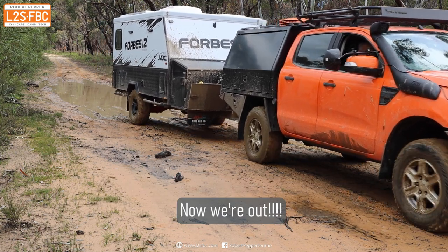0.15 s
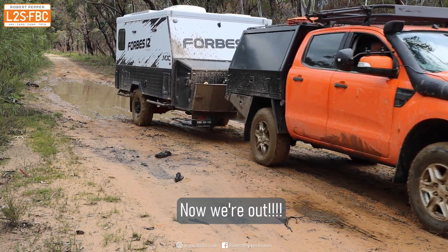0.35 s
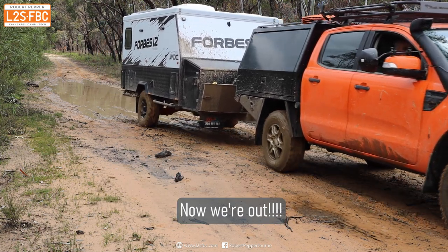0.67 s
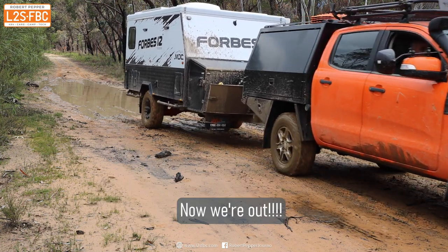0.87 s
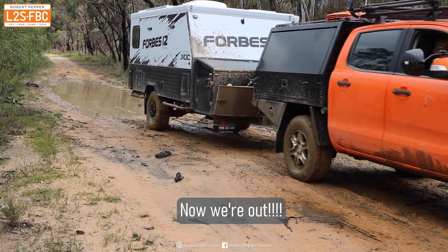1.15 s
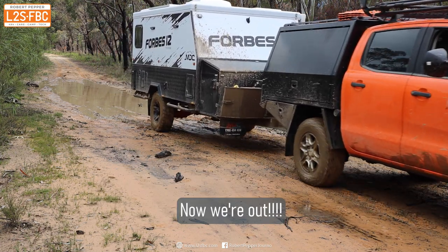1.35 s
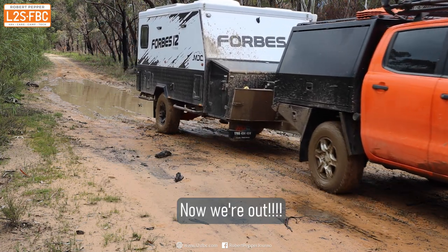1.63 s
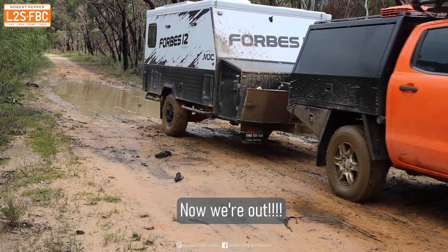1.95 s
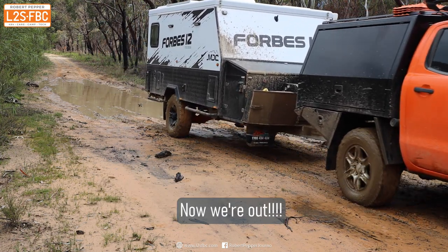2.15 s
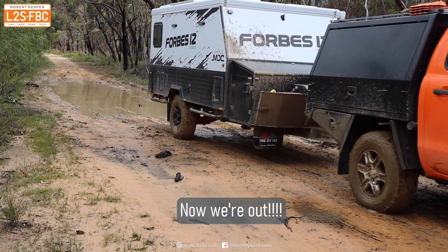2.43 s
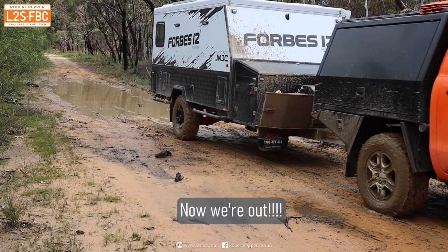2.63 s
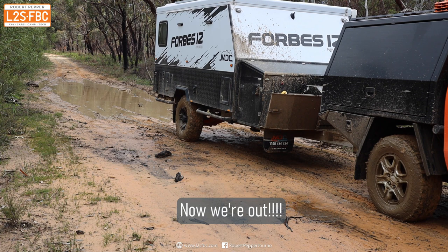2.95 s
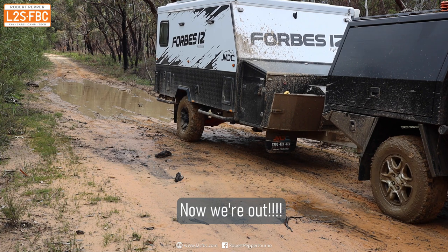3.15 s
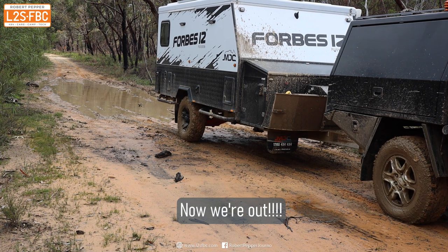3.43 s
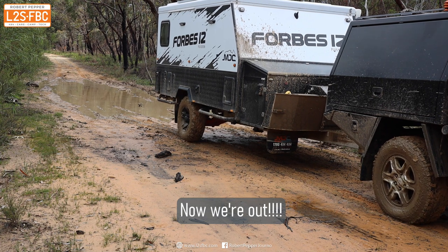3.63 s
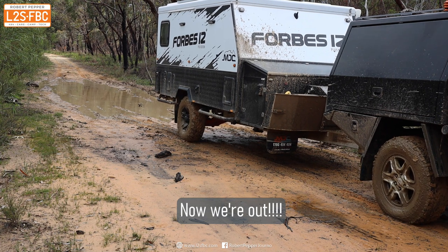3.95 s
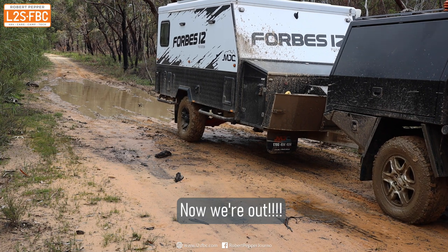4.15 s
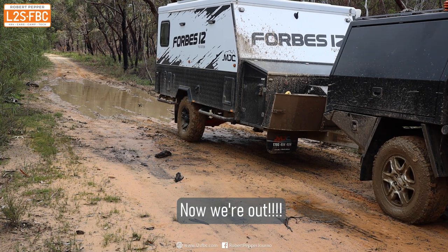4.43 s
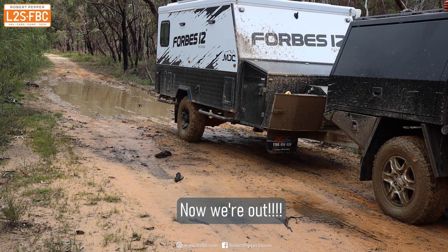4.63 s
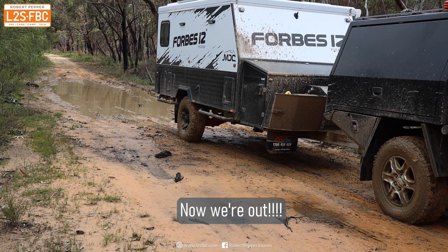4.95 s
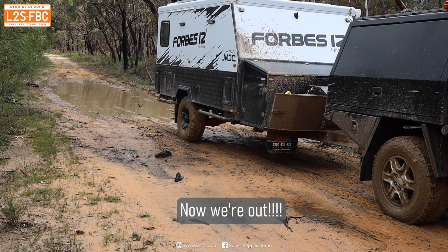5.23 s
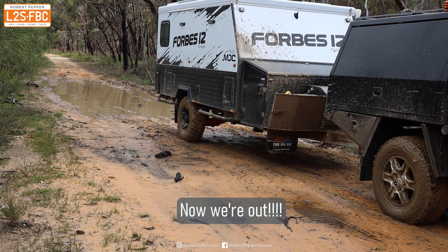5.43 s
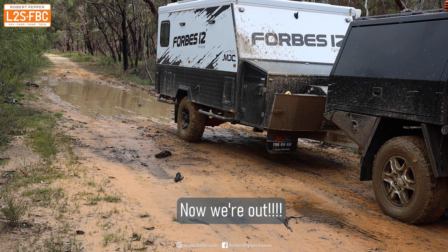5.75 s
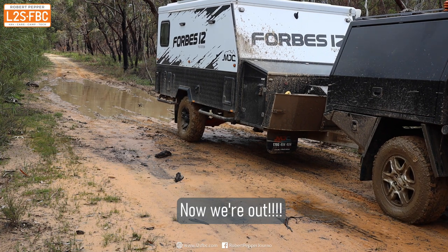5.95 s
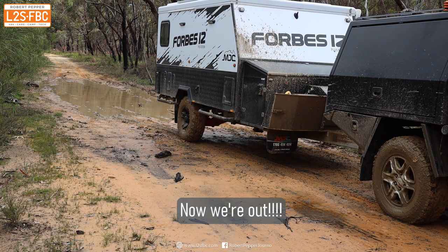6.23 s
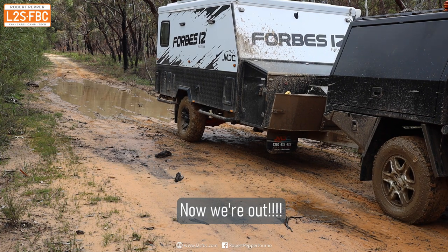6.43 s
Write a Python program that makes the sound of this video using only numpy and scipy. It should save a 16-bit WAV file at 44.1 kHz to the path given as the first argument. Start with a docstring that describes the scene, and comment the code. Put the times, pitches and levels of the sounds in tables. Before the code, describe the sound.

A diesel pickup growls under load pulling a trailer through mud, drops to a low throbbing idle, then creeps on with clattering knock and airy roar.

```python
"""A five-cylinder diesel pickup drags a trailer out of mud, drops to idle and creeps on, close by on the right.
The tailpipe throbs once per firing: six sine waves in step with the engine, coloured by the pipe.
Each cylinder strikes the ringing silencer and engine block with its own strength.
The hitch cracks, faint treble bursts flick past, and filtered noise makes the roar of fan and intake.
A small two-port stereo microphone hears it: bass in the middle, treble right and out of phase."""
import sys
import numpy as np
from scipy import signal
from scipy.fft import rfft, irfft, next_fast_len
from scipy.io import wavfile

SR = 44100
rng = np.random.default_rng(int(sys.argv[2]) if len(sys.argv) > 2 else 0)


def output_pcm(signal):
    """Save a mono or channel-first signal as 16-bit PCM at the path in sys.argv[1].

    Samples are clipped to [-1, 1] before scaling.
    """
    pcm = np.clip(np.atleast_2d(signal).T, -1, 1) * 32767
    wavfile.write(sys.argv[1], SR, np.round(pcm).astype(np.int16))


def gain_from_db(level_db):
    """Convert decibel levels to linear amplitude factors (20 dB per decade)."""
    decades = np.asarray(level_db, float) / 20
    return 10 ** decades


N = 290609   # length in samples

# engine speed: t/s, firing rate/Hz
FIRING_RATE = [(0.0, 48.664), (0.299, 47.557), (0.598, 48.269), (0.875, 45.852), (1.165, 44.738),
               (1.518, 34.336), (1.642, 36.132), (2.046, 35.892), (2.2, 34.474), (2.403, 35.479),
               (2.58, 33.83), (3.034, 34.269), (4.396, 34.126), (4.717, 38.403), (4.823, 36.946),
               (5.219, 35.16), (5.994, 34.262), (6.59, 34.219)]
# when one stage hands over to the next: from, to, from, to ... t/s
# the five stages are pulling, easing off, rolling, creeping, standing
HAND_OVERS = [.6, .85, 1.3, 1.6, 2.3, 2.8, 4.5, 4.8]
# strength of the exhaust pulse: t/s, rms level of its first order before the pipe/dB
EXHAUST = [(0, -4), (1.2, -6), (1.7, -5), (2.4, -3), (2.6, -5.5), (4.4, -3.5), (4.85, -9), (6.59, -9.5)]
# what exhaust pipe and ground pass on: f/Hz, level/dB
PIPE = [(34, -30), (38, -25.5), (48, -13), (67, -9.5), (75, -15), (88, -14), (98, -4.5), (110, 2), (134, 3),
        (146, -2.5), (158, -8), (170, -2.2), (188, 8.5), (222, -15), (240, 2.5), (265, -28), (290, 2.5)]
# ringing tones of the silencer: f/Hz, t60/s, moment of the strike/firing intervals,
# ring level at each stage/dB, extra level of each cylinder/dB
SILENCER = [(141, 0.085, 0.318, [-30.5, -30.5, -22, -25, -22], [7.5, 5, -12, -9.5, -30]),
            (165.3, 0.14, 0.43, [-31, -31, -27, -21.5, -30.5], [0, 9, -25.5, -0.5, -11.5]),
            (191, 0.4, 0.46, [-52, -26.5, -22, -21.5, -26.5], [3, -9, -24, 1.5, -28]),
            (209.2, .12, 0.446, [-54, -33, -36, -24, -38], [-2.5, 5, -22.5, -10.5, 2]),
            (239, 0.13, 0.506, [-31, -39, -8, -26, -29], [-5, -11, -8, -11.5, -9]),
            (278, 0.018, 0.528, [-10, -32, -19, -33, -54], [3, -20.5, 3.5, -26.5, 5.5])]
# ringing tones of block, covers and panels: same columns
BLOCK = [(371.9, 0.077, .7, [-23.5, -18.5, -26.5, -20, -23.5], [-2, -3.5, -8, -12, -2.5]),
         (558.8, 0.23, .65, [-37, -40.5, -31.5, -34.5, -36.5], [7, 3.5, 0, -5.5, -11]),
         (607.7, 0.062, .55, [-23, -29, -42, -24.5, -29.5], [2, -1.5, -10, -3, 2.5]),
         (1042, .11, .72, [-36, -42, -30, -22.5, -33], [-12, -13, -16, 0, -6]),
         (1164, 0.05, 0.45, [-33, -45, -30, -24, -38], [0, -2, -2, -13, -8]),
         (1400, 0.022, .7, [-23, -22, -22.5, -52, -45], [-3.5, 2.5, -0.5, -4, 2]),
         (1293, .11, .75, [-36, -36, -26, -36, -25], [0, -6, -4, -4, -7]),
         (1497, .1, .7, [-34, -24, -31, -25, -34], [-9, -5, -9, 0, -2]),
         (1629, 0.068, .7, [-36.5, -30, -30, -25, -38], [-8, 3.5, -1, -16, -15.5]),
         (1850, 0.06, 0.55, [-29, -40, -23, -50, -36], [0, -4, -1, -10, -12]),
         (1935, .04, .8, [-33, -37, -34, -33, -26], [0, -3, -4, -2, -7]),
         (2140, .017, .6, [-28, -23, -26, -17.5, -19], [-1, -9, 0, -1, -9]),
         (2520, 0.067, 0.76, [-36, -31, -52, -47, -39.5], [0, -20, -13, -1, -4]),
         (3120, .014, .7, [-32, -30, -32, -27, -28], [0, -5, -1, -3, -4]),
         (3800, 0.019, 1, [-44, -42, -44, -43, -57], [0, -22.5, -4, -1, 8.5])]
# tow hitch and chains take up slack: t/s, level of the main ring/dB, f/Hz, t60/s
HITCH = [(0.429, -21.5, 2000, 0.041), (2.088, -16.5, 278, 0.19), (4.296, -23.5, 2800, 0.029)]
# faint short bursts of bright noise: t/s, starting level/dB
TREBLE_BURSTS = [(1.409, -47), (2.068, -49.5), (2.549, -48.5), (2.859, -49), (3.101, -50), (3.244, -47.5),
                 (4.228, -45.5), (4.293, -50)]
# air noise of fan, intake and tyres, before any echo: t/s, roar level/dB, hiss level/dB
AIR = [(0.0, -22, -40.5), (1.0, -22.5, -41.5), (1.38, -25, -40.5), (2.0, -23.5, -40.5), (2.4, -24, -44.5),
       (3.4, -27.5, -51), (4.5, -27.5, -49.5), (6.59, -28.5, -46)]
# colour of the roar, only the shape counts: f/Hz, level per Hz/dB
ROAR = [(30, -32), (45, -28.5), (110, -8), (190, -7.5), (290, -9), (400, -11.5), (570, -15), (900, -16.5),
        (1150, -20), (1370, -15), (1560, -16.5), (1780, -21.5), (2200, -19), (3200, -29.5), (3600, -14.5),
        (4500, -56), (7000, -73), (9000, -88)]
# colour of the hiss, only the shape counts: f/Hz, level per Hz/dB
HISS = [(2000, -10), (3000, 14), (3500, -3.5), (4200, -11.5), (5000, -1), (6000, -34), (7000, -28),
        (8500, -11.5), (10500, -44.5), (13000, -58), (15500, -62)]
# echo of the engine bay off ground and bodywork: delay at each stage, t/s
ECHO_DELAY = [.00127, .00134, .00162, .00185, .00147]
# strength of that echo at each stage: level/dB
ECHO_LEVEL = [-18, -9, -13, -9, -16]
# the range the echo keeps: lower f/Hz, upper f/Hz
ECHO_BAND = [390, 2500]
# microphone: f/Hz, side over mid level before the trim/dB, side phase/rad,
# share of the side's power that comes straight from the truck
PORTS = [(60, -41, 2.4, .4), (170, -26, 2.4, 0.72), (350, -19.5, 2.8, .75), (700, -10.5, 2.7, 0.97),
         (1400, -2.5, 3.45, 0.97), (2800, 2, 3.92, 0.94), (5400, 5.5, 3.9, 0.85), (7200, 11, 3.5, 0.5),
         (12000, 7.5, 4, 0.56)]
# the engine bay swings further to the right: t/s, trim of the side level/dB
SIDE_TRIM = [(0, -3.5), (1.5, -1.5), (3, 1), (6.59, 1.7)]


def tailpipe(per_s, turns):
    """Exhaust pulses: a lopsided wave built from six multiples (orders) of the firing rate."""
    pulse_turn = 0.38        # place of the pulse within a firing interval
    fall_db = 12             # per octave of order: the pulse is a blunt one
    skew_rad = 2.05          # lag common to all orders: sets how lopsided the pulse is
    cancel_hz, damping, width = 89.5, 0.055, 0.53   # where two paths through the silencer cancel
    angle = 2 * np.pi * (turns - pulse_turn)
    pulse_db, = in_time(EXHAUST)
    out = 0
    for order in range(1, 7):
        hz = order * per_s
        # each order slides through the pipe's colour as the speed changes
        level_db = pulse_db - fall_db * np.log2(order) + at_hz(PIPE, hz)
        flicker_db = 0.12 * drift(6.8)
        x = hz / cancel_hz
        # orders below the cancelling pitch lag, those above it lead
        lead = np.angle((1 - x * x + 1j * x * damping) / (1 - x * x + 1j * x * width))
        wave = np.sin(order * angle + lead - skew_rad)
        out = out - np.sqrt(2) * gain_from_db(level_db + flicker_db) * wave
    return out


def silencer(turns):
    """The differences between the cylinders set the silencer ringing."""
    return struck(turns, SILENCER, scatter_db=0.4, scatter_s=0.00028, uneven_only=0.87, rattle_db=-np.inf)


def block_knock(turns):
    """Combustion knock strikes block, covers and panels, and loose parts rattle along."""
    return struck(turns, BLOCK, scatter_db=1.1, scatter_s=.0002, uneven_only=0, rattle_db=-39)


def struck(turns, modes, scatter_db, scatter_s, uneven_only, rattle_db):
    """Every firing strikes every ringing tone, with its cylinder's strength and a little chance."""
    soft_onset = .15   # a body takes about this share of its ring time to get going
    t = np.arange(N) / SR
    firing = np.arange(int(turns[-1]) + 1)
    out = np.zeros(N)
    for hz, t60, turn, stage_db, cylinder_db in modes:
        chance = rng.standard_normal((len(firing), 2))
        s = np.interp(firing + turn, turns, t) + scatter_s * chance[:, 0]
        strength = gain_from_db(cylinder_db)
        # the part shared by all cylinders is already in the tailpipe's orders
        strength = strength - uneven_only * strength.mean()
        blow_level = gain_from_db(by_stage(s, stage_db) + scatter_db * chance[:, 1])
        blows = strength[firing % 5] * blow_level
        at = np.clip(s * SR, 0, N - 1).astype(int)
        shaking = gain_from_db(by_stage(t, stage_db) + rattle_db)   # loose parts keep the tone alive
        drive = np.bincount(at, blows, N) + shaking * rng.standard_normal(N)
        # taking away a faster-dying ring softens the onset
        out += 1.06 * (ring(drive, hz, t60) - ring(drive, hz, soft_onset * t60))
    return out


def hitch():
    """Slack taken up: each click rings one main tone and two weaker, higher ones."""
    out = np.zeros(N)
    for s, level_db, hz, t60 in HITCH:
        click = np.zeros(N)
        click[round(s * SR)] = gain_from_db(level_db)
        out += ring(click, hz, t60)
        out += 0.23 * ring(click, 1.8 * hz, 0.31 * t60)
        out += 0.24 * ring(click, 1.7 * hz, t60)
    return out


def treble_bursts():
    """Each burst is a short stretch of bright noise that starts at once and dies away."""
    t60 = 0.083   # s
    t = np.arange(N) / SR
    bursts = np.zeros(N)
    for s, level_db in TREBLE_BURSTS:
        bursts += (t >= s) * gain_from_db(level_db - 60 * np.maximum(t - s, 0) / t60)
    bright = signal.butter(2, [3500, 7500], "band", fs=SR, output="sos")
    noise = signal.sosfilt(bright, rng.standard_normal(N))
    return bursts * amp_rms(noise)


def air_noise(turns):
    """Rushing air: the roar of fan and intake with the hiss above it."""
    roar_db, hiss_db = in_time(AIR)
    roar = gain_from_db(roar_db) * air(ROAR, turns, patchy_db=1.0, puff_db=1.5, puff_turn=0.83)
    hiss = gain_from_db(hiss_db) * air(HISS, turns, patchy_db=.9, puff_db=1.5, puff_turn=.8)
    return roar + hiss


def air(spectrum, turns, patchy_db, puff_db, puff_turn):
    """Third-octave noise bands flicker and swell with each firing, most in the treble; rms 1."""
    edges = 35 * 2 ** np.arange(0, 8.8, 1 / 3)   # Hz
    white = rng.standard_normal((2, N))
    together = drift(24)   # flicker shared by all bands
    puff = np.cos(2 * np.pi * (turns - puff_turn))
    out = 0
    for k, (low, high) in enumerate(zip(edges, edges[1:])):
        hz = np.sqrt(low * high)
        level_db = at_hz(spectrum, hz)
        if level_db > -75:   # leave out bands too faint to matter
            band_filter = signal.butter(2, [low, high], "band", fs=SR, output="sos")
            band = signal.sosfilt(band_filter, white[k % 2])   # neighbours use separate noise
            swell_db = puff_db * puff * hz / (hz + 700)
            flicker_db = patchy_db * (0.6 * together + drift(16))
            out = out + band * gain_from_db(level_db + swell_db + flicker_db)
    return amp_rms(out)


def with_echo(x):
    """A late copy, thin in bass and treble, combs the sound; its delay glides from stage to stage."""
    t = np.arange(N) / SR
    thin = signal.sosfilt(signal.butter(1, ECHO_BAND, "band", fs=SR, output="sos"), x)
    late = np.interp(t - by_stage(t, ECHO_DELAY), t, thin)
    return x + gain_from_db(by_stage(t, ECHO_LEVEL)) * late


def ring(clicks, hz, t60):
    """A two-pole resonator: a unit click sets a dying sine of starting height 1 ringing."""
    r = gain_from_db(-60 / (max(t60, .003) * SR))   # shrinkage per sample
    w = 2 * np.pi * hz / SR
    return signal.lfilter([0, np.sin(w)], [1, -2 * r * np.cos(w), r * r], clicks + 1e-18)


def drift(rate):
    """Slow random wandering with spread 1, from smoothed noise; a higher rate wanders faster."""
    r = np.exp(-80 * np.pi * rate / SR)   # one noise value for every 40 samples
    noise = rng.standard_normal(N // 40 + 2002)
    slow = signal.lfilter([1], [1, -2 * r, r * r], noise)[2000:]   # skip the start-up
    return np.interp(np.arange(N) / 40, np.arange(len(slow)), amp_rms(slow))


def by_stage(s, stage_values):
    """Values hold during a stage of the drive and glide across the hand-overs."""
    return np.interp(s, HAND_OVERS, np.repeat(stage_values, 2)[1:-1])


def in_time(rows):
    """Columns of a table over time, one value per sample."""
    s, *columns = np.transpose(rows)
    return [np.interp(np.arange(N) / SR, s, c) for c in columns]


def at_hz(points, hz, column=1):
    """Column of a table read on a log-frequency axis."""
    points = np.array(points)
    return np.interp(np.log(hz), np.log(points[:, 0]), points[:, column])


def amp_rms(x):
    """Scale to rms 1."""
    return x / np.sqrt(np.mean(x ** 2) + 1e-20)


def scene():
    """Direct sound of the truck, and its air noise scattered by trees, trailer and ground."""
    per_s, = in_time(FIRING_RATE)
    turns = .59 + np.cumsum(per_s) / SR   # firings so far; the sound starts at 0.59
    knock = block_knock(turns)
    pipe = tailpipe(per_s, turns) + silencer(turns)
    direct = pipe + knock + hitch() + treble_bursts() + with_echo(air_noise(turns))
    scattered = gain_from_db(5.5) * with_echo(air_noise(turns))   # fresh noise, unlike the direct one
    return np.array([direct, scattered])


def top_cut(x):
    """Nothing passes above the cut-off."""
    return signal.sosfilt(signal.butter(12, 15500, fs=SR, output="sos"), x)


def record(dry):
    """Half the sum of left and right is the mid; half their difference, shaped by pitch, is the side."""
    bass_cut = signal.butter(4, 27, "high", fs=SR, output="sos")
    direct, scattered = signal.sosfilt(bass_cut, dry)
    size = next_fast_len(N + 4096)
    hz = np.maximum(np.arange(size // 2 + 1) * SR / size, 1)
    share = np.clip(at_hz(PORTS, hz, column=3), 0, 1)
    across = np.sqrt(share) * rfft(direct, size) + np.sqrt(1 - share) * rfft(scattered, size)
    phase = at_hz(PORTS, hz, column=2)
    level_and_phase = gain_from_db(at_hz(PORTS, hz)) * np.exp(1j * phase)
    trim_db, = in_time(SIDE_TRIM)
    side = irfft(across * level_and_phase, size)[:N] * gain_from_db(trim_db)
    left, right = direct + side, direct - side
    return top_cut(np.array([left, right]))


dry = scene()
out = record(dry)
output_pcm(out)
```